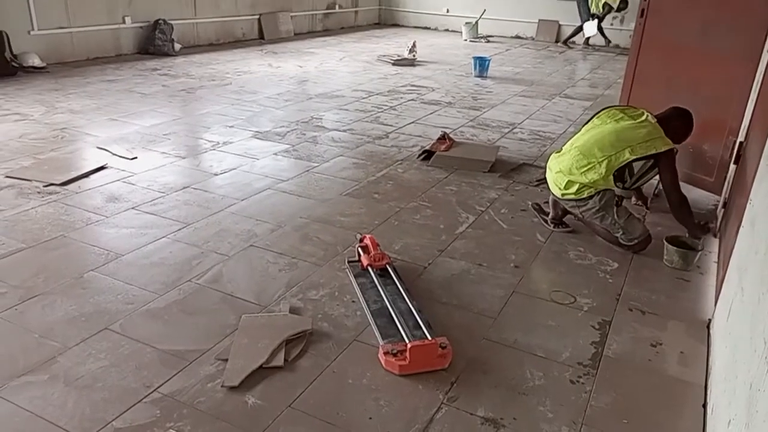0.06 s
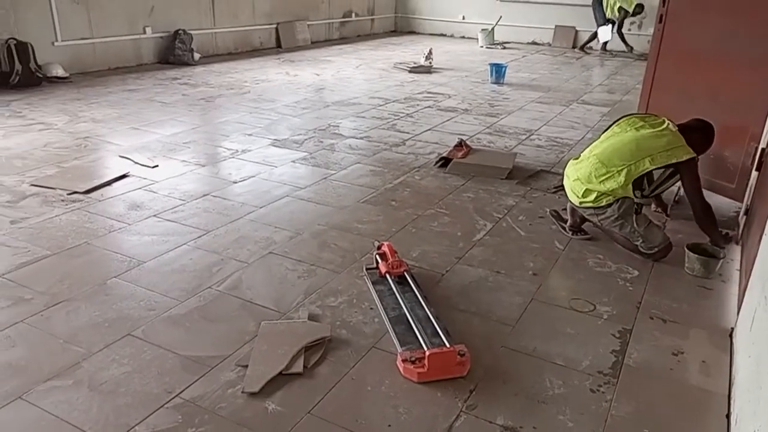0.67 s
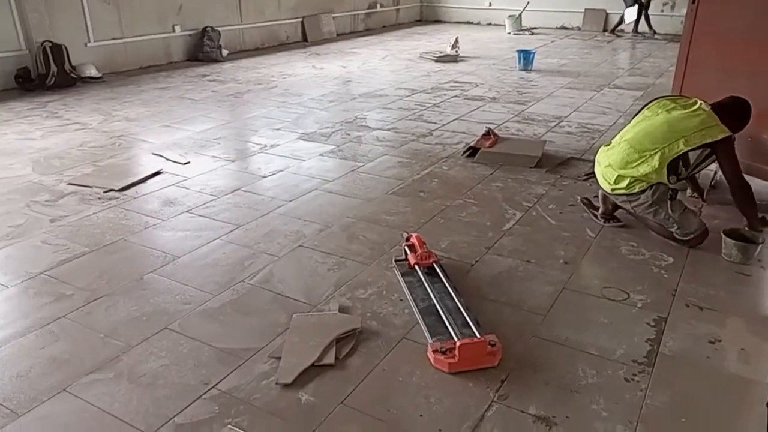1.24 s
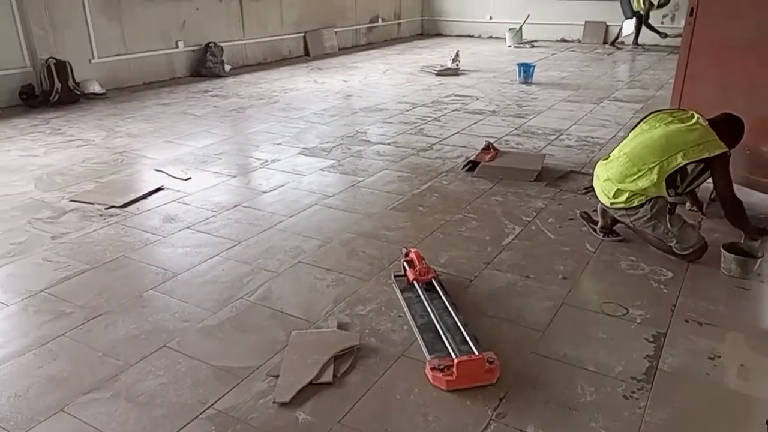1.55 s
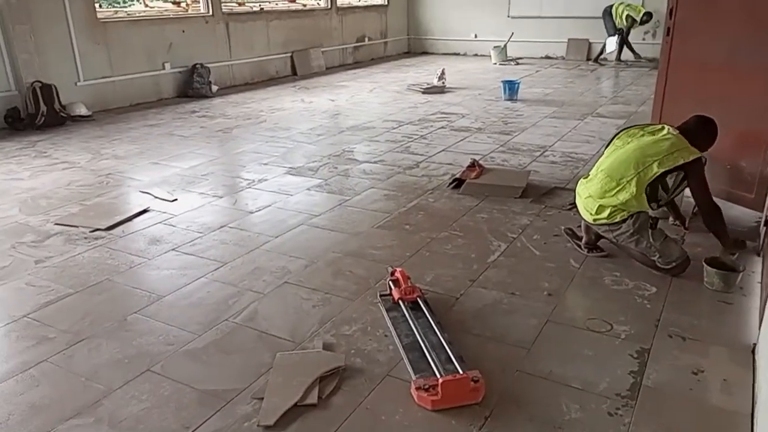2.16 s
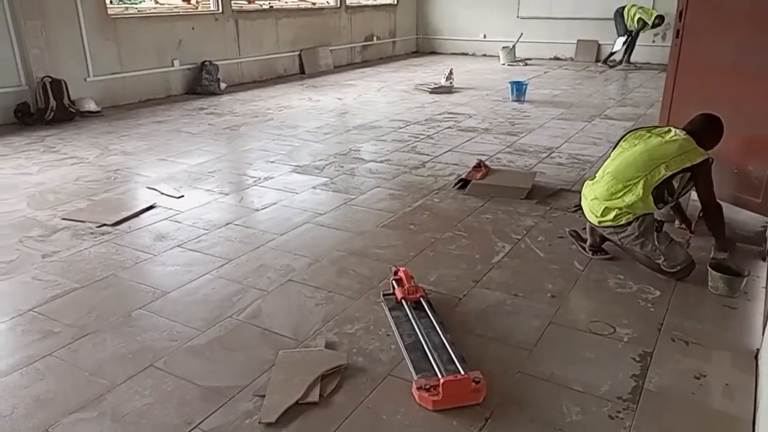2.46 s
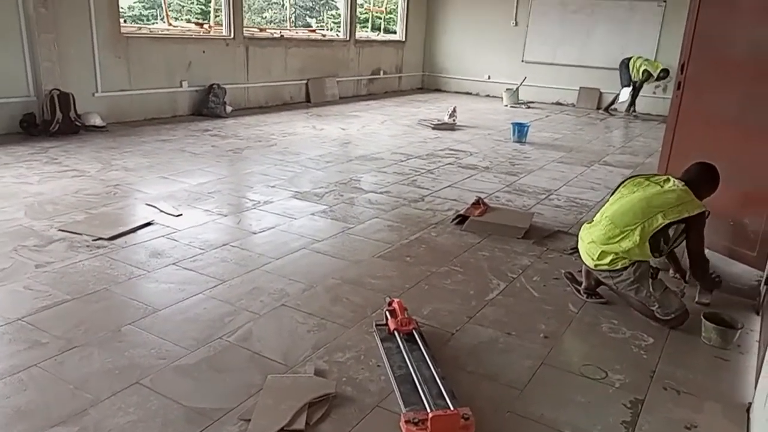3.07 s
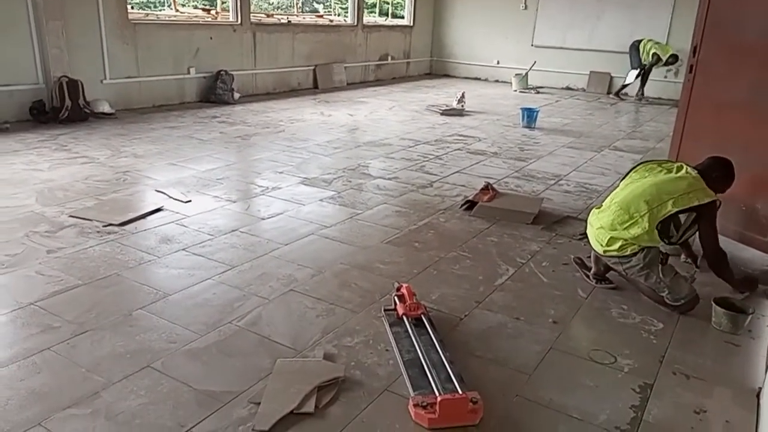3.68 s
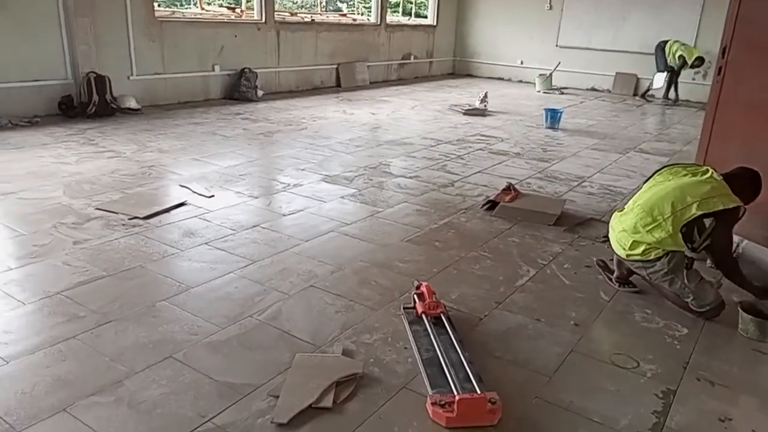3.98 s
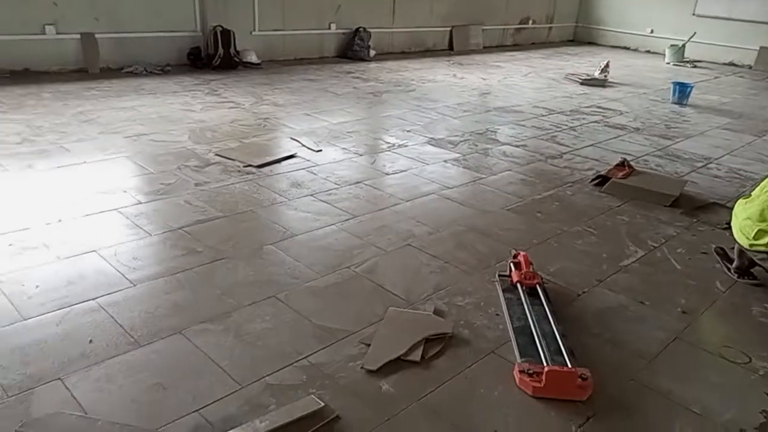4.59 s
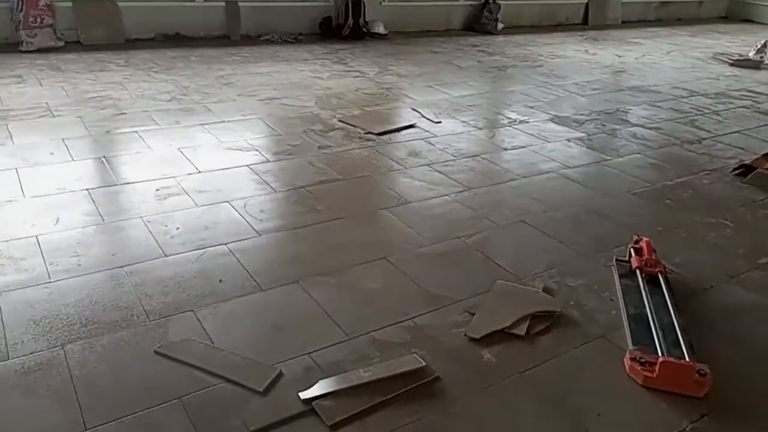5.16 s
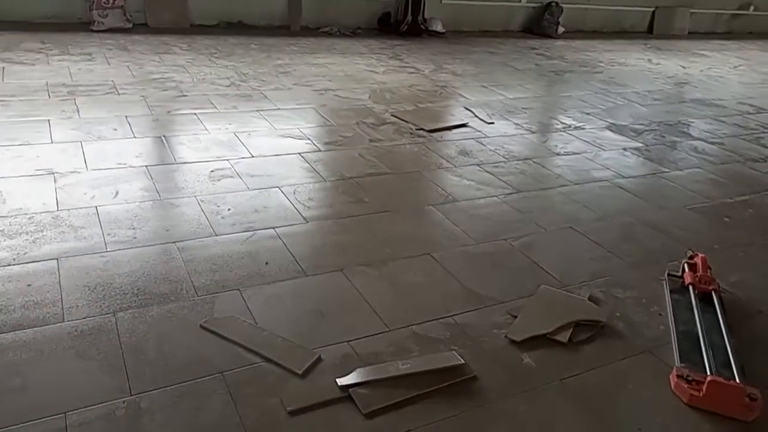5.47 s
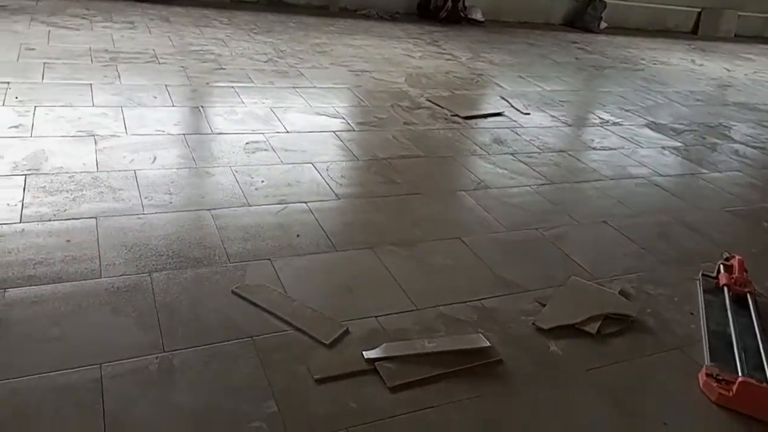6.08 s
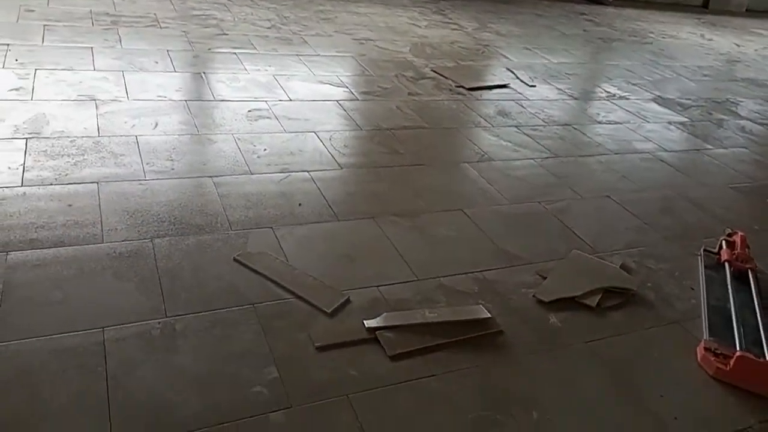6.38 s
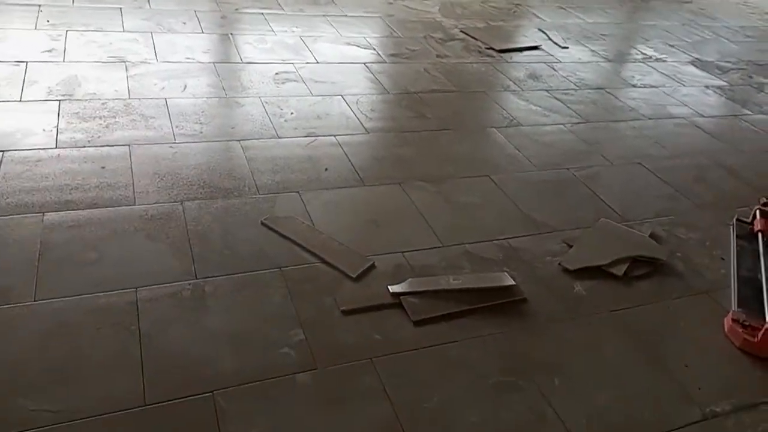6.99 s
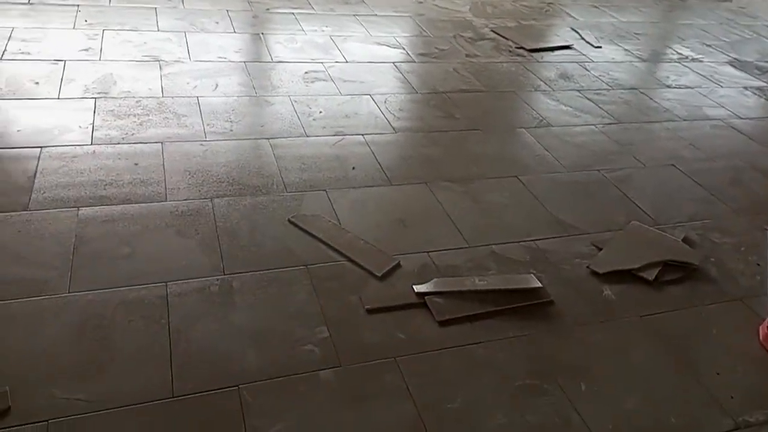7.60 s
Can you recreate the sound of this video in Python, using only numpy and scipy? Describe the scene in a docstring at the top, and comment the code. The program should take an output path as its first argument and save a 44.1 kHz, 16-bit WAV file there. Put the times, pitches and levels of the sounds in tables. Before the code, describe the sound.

A hard tool taps ceramic floor tiles into wet mortar from start to finish, about eight seconds, at three or four blows a second. Each tap is a short dead clack with a slight clink, and the large bare room rings for about half a second after it. The taps are firm and even for the first three seconds, with slight hesitations near 1.4, 2.3 and 3.4 seconds. They are a little softer and duller from about 3.6 to 4.6, firmer from 5 to 6, then lighter and less even. A small distant knock with a bright click comes near 2.9 seconds, a dull distant knock near 5.6, and a faint tick near 6.7. Faint room air and low rumble lie underneath, with soft bumps on the hand-held microphone around 3 and 3.6 seconds and between 6 and 6.5.

```python
"""A large bare room, where a tiler beds ceramic floor tiles with quick taps of a hard tool.
Each tap is a short dead clack: the tile's modes ring for milliseconds before wet mortar soaks them up.
Ceiling and walls throw it back, then the room rings for half a second. Under it lie faint air and
the rumble of a hand-held microphone, which also picks up a few soft bumps. Two duller knocks come
from farther off, the first small and with a bright click; a lone faint tick follows later."""
import sys
import numpy as np
from scipy import signal
from scipy.fft import rfft, irfft
from scipy.io import wavfile
from scipy.ndimage import uniform_filter1d, minimum_filter1d

SR = 44100
rng = np.random.default_rng(int(sys.argv[2]) if len(sys.argv) > 2 else 0)


def generate_wav(signal):
    """Clip the signal to [-1, 1] and save it as 16-bit WAV at the path in sys.argv[1]."""
    frames = np.transpose(np.atleast_2d(signal))
    scaled = np.clip(frames, -1, 1) * 32767
    pcm = np.round(scaled).astype(np.int16)
    wavfile.write(sys.argv[1], SR, pcm)


N = 345730
SIZE = 24576  # samples in one hit with its tail
HZ, TIME = np.fft.rfftfreq(SIZE, 1 / SR), np.arange(SIZE) / SR


def amp(db):
    """Decibels to gain."""
    return 10 ** (np.asarray(db) / 20)


def curve(points, hz=HZ):
    """Breakpoints joined by straight lines on a log-frequency axis."""
    freqs, values = np.transpose(points)
    return np.interp(np.log(hz + 1), np.log(freqs + 1), values)


def follow(automation, s):
    """The value of each automation lane at time s."""
    times, *lanes = np.transpose(automation)
    return [np.interp(s, times, lane) for lane in lanes]


def add(mix, s, sound):
    """Mixes a sound in at time s."""
    start = round(s * SR)
    sound = sound[max(-start, 0):]
    part = mix[max(start, 0):][:len(sound)]
    part += sound[:len(part)]


def bell(hz, width):
    """A resonance curve of height 1."""
    return 1 / (1 + (2 * (HZ - hz) / width) ** 2)


def ripple(width_hz):
    """A random EQ curve of unit spread, with lumps about this wide."""
    smoothing = np.exp(-(np.arange(len(HZ)) * width_hz / SR * np.pi / 2) ** 2)
    lumps = irfft(rfft(rng.standard_normal(SIZE)) * smoothing)[:len(HZ)]
    return lumps / lumps.std()


def eq(db):
    """The minimum-phase response that has this gain."""
    log_gain = np.log(amp(np.r_[db, db[-2:0:-1]]))
    return np.exp(np.conj(signal.hilbert(log_gain)))[:len(db)]


def delay(s):
    """The response of a plain delay."""
    return np.exp(-2j * np.pi * HZ * s)


# tone of a struck tile on wet mortar (frequency [Hz], gain [dB])
TILE_EQ = [(50, -23), (140, -6.5), (220, 13.5), (320, 18.5), (450, 12), (900, 11.5), (1400, 10.5),
           (1750, 15.5), (2650, 13), (3050, 4), (3700, 0.5), (4350, 4), (4900, 13), (6400, 16)]
# steep roll-off above the clink (frequency [Hz], gain [dB])
TILE_ROLLOFF = [(6400, 1), (7000, -8), (7600, -20.5), (8500, -33), (10000, -45.5), (14000, -50.5),
                (15300, -44)]
def tile_tone(force_db, hardness_db):
    """One blow's spectrum in dB: force barely lifts the thud; a hard contact lifts the edge most."""
    thud = 0.5 + 0.042 * force_db
    body = force_db + 0.03 + 0.05 * hardness_db
    clink = force_db + 1.5 + 0.49 * hardness_db
    edge = force_db + hardness_db
    colour = [(350, thud), (550, body), (1150, body), (1650, force_db), (3000, force_db),
              (4700, clink), (6000, clink), (7000, edge)]
    return curve(TILE_EQ) + curve(TILE_ROLLOFF) + curve(colour)


def tile_waves(spread_s=0.002181, decay_s=0.001):
    """Bending waves leave the tile treble first, and scatter between its edges until mortar damps them."""
    travel_s = spread_s / np.sqrt(1 + HZ / 1500)
    bending = np.exp(-2j * np.pi * np.cumsum(travel_s) * HZ[1])
    bounces = rng.standard_normal(SIZE) * TIME * np.exp(-TIME / decay_s)
    return (bending + rfft(bounces) / np.linalg.norm(bounces)) / np.sqrt(2)


# tone of the direct path along the floor (frequency [Hz], gain [dB])
DIRECT_EQ = [(130, 1.5), (300, 2), (430, -6.5), (570, 6.5), (860, -20), (1150, -1.5), (1800, -3.5),
             (2600, 3.5), (3600, -15), (5000, -0.5), (5600, -17), (6400, -1), (9000, 6)]
# tone of the ceiling slap (frequency [Hz], gain [dB])
CEILING_EQ = [(300, -8), (900, 2.5), (1500, 7), (2400, 6), (3500, 1.5), (5000, -6.5), (9000, 5.5)]
# early reflections off the walls (delay [s], level [dB], treble cut [dB])
WALL_ECHOES = [(.0046, -18.5, 12), (.0105, -27.5, 4.5), (0.0195, -27.5, -7.5), (0.0295, -15.5, 0),
               (0.034, -16.5, 1), (.0522, -22.5, 7)]
# as the microphone turns away, the direct path dulls and the ceiling comes forward
# (time [s], direct level [dB], direct treble shelf [dB], ceiling level [dB])
MIC_TURN = [(0, -5.5, -4.5, -20), (3.2, -5, -5, -19.5), (4.2, -3.5, -5, -12), (4.55, -6.5, -1, -16.5),
            (5.2, -8.5, -7, -16.5), (5.8, -6.5, -11, -15.5), (6.75, -3, -9, -9.5), (7.45, -7, -14, -16)]
def early_paths(s, shelf_hz=3800, ceiling_s=0.0258, wall_db=-2.5):
    """The ways a tap at time s reaches the microphone: direct, off the ceiling and off the walls."""
    direct_db, shelf_db, ceiling_db = follow(MIC_TURN, s)
    shelf = HZ ** 2 / (HZ ** 2 + shelf_hz ** 2)
    direct = amp(direct_db + shelf_db * shelf) * eq(curve(DIRECT_EQ))
    ceiling = amp(ceiling_db) * eq(curve(CEILING_EQ)) * delay(ceiling_s)
    walls = sum(delay(lag) * amp(db - cut * HZ / (HZ + 1500)) for lag, db, cut in WALL_ECHOES)
    return direct + ceiling + amp(wall_db) * walls


# reverb time of the bare room (frequency [Hz], base T60 [s])
ROOM_DECAY = [(150, 0.2), (300, 0.28), (700, 0.39), (1800, 0.49), (2600, 0.47), (3700, 0.37), (5200, 0.46),
              (6800, 0.41), (10000, 0.17)]
# narrow room resonances; the boosted ones hang on longer (frequency [Hz], width [Hz], gain [dB])
ROOM_MODES = [(234, 16, 0.5), (308, 12, -3), (344, 51, 1.5), (478, 30, 1.5), (625.3, 25, 7), (687, 5, -0.5),
              (775, 30, 3), (1430, 37, 2), (1710, 25, -3.5), (1755, 54, 3.5), (2674, 140, 3), (4856, 92, 3),
              (6700, 9.7, 0.5), (7070, 29, 1.5)]
ROOM_MODES_DB = sum(db * bell(hz, width) for hz, width, db in ROOM_MODES)
def room_tail(ring_hz, boom_hz, thin_db=-3, bloom_s=0.032, hold_s=0.076):
    """Reverb spectrum: thin until the ceiling answers, it holds, then dies; ring and boom linger."""
    linger = 1 + 0.066 * ROOM_MODES_DB + 0.11 * bell(ring_hz, 130) + 0.18 * bell(boom_hz, 60)
    t60 = curve(ROOM_DECAY) * linger * np.exp(0.18 * ripple(110))
    hz, t, bands = signal.stft(rng.standard_normal(SIZE), SR, nperseg=1024)
    decay = amp(-60 * np.maximum(t - hold_s, 0) / np.interp(hz, HZ, t60)[:, None])
    tail = signal.istft(bands * decay, SR, nperseg=1024)[1][:SIZE]
    attack = np.minimum(TIME / 0.00067, 1)
    bloom = amp(thin_db * np.clip((bloom_s - TIME) / 0.0031, 0, 1))
    spectrum = rfft(tail * attack * bloom)
    return spectrum / np.sqrt(uniform_filter1d(abs(spectrum) ** 2, size=160))  # flatten the broad tone


# the tile's modes drift as the tool moves over it; the main mode is the one that feeds the reverb
# (time [s], main mode [Hz], knock [Hz], ping [Hz], ping boost [dB])
TILE_MODES = [(0, 2510, 1530, 6090, 15), (1.7, 2310, 1800, 6500, 3.5), (3.2, 2540, 1478, 6450, 9),
              (4.6, 2350, 1590, 6360, 9.5), (5.2, 2580, 1380, 4700, 11), (5.8, 2640, 1070, 4670, -3),
              (6.2, 2880, 1790, 4880, 11), (6.8, 2740, 1230, 5120, 11.5), (7.6, 2780, 1680, 5130, 14)]
# the lowest mode booms more where the mortar leaves a hollow (time [s], pitch [Hz], boost [dB])
HOLLOW_BOOM = [(0, 302, -0.5), (2.9, 280, -2), (3.65, 280, -2), (4.1, 310, 0.5), (6.1, 353, 1),
               (6.8, 343, 2), (7.12, 381, 6.5), (7.7, 358, 0)]
# the tiler's blows (time [s], force [dB], contact hardness [dB], ring pitch [Hz], ring boost [dB])
TAPS = [(-0.115, 0.5, 3.5, 2580, -4), (0.1582, -0.5, 5, 2530, 12.5), (0.4413, 1, 4.5, 2600, 8),
        (0.7146, 0, 4, 2637, 12.5), (0.98, 0.5, 4.5, 2640, 9.5), (1.2461, -0.5, 5, 2800, 9.5),
        (1.6217, 0.5, 4.5, 2600, 9), (1.8723, 0.5, 6.5, 2560, 5.5), (2.0864, 0.5, 3.5, 2180, 4),
        (2.4318, 0.5, 2, 2520, 8.5), (2.6944, 0.5, 4.5, 2503, 11), (2.9491, -0.5, 4, 2480, 10),
        (3.2264, -0.5, 5, 2410, 8), (3.647, -4, 2, 2480, 6), (3.8271, 1.5, -22, 2220, 5.5),
        (4.1048, -3, -7.5, 2350, 13), (4.3293, -3, -1, 2285, 20), (4.5359, -3, 1.5, 2250, 16),
        (4.8296, -0.5, -1, 2130, 13.5), (5.182, -1, 6, 2670, 9.5), (5.514, 0, 4.5, 2730, 6.5),
        (5.785, -1, 4.5, 2420, 10), (6.1479, -4, -0.5, 2200, 5), (6.3192, -7, 0.5, 2060, 9),
        (6.59, -6.5, -5, 2110, 12.5), (6.8108, -0.5, -4, 2170, 2), (7.1168, -4.5, 0.5, 2727, 15),
        (7.446, -4, -1.5, 2820, 19.5), (7.6578, -1.5, -1, 2040, 12.5)]
def tile_taps(main_db=4.5, knock_db=6, weak_db=2, spot_db=1.77, reverb_db=-2.5, crossfade_s=0.45):
    """Each blow briefly rings a few damped modes of the tile, coloured by where the tool lands."""
    out = np.zeros(N)
    spare_lows = np.minimum(HZ / 700, 1)
    # the tail and the tile's many weak modes change as tool and microphone move
    keyframes = np.linspace(0, N / SR, num=16)
    tails = np.array([room_tail(follow(TILE_MODES, s)[0], follow(HOLLOW_BOOM, s)[0]) for s in keyframes])
    weak_modes_db = weak_db * np.array([ripple(130) for _ in keyframes]) * spare_lows
    for s, force_db, hardness_db, ring_hz, ring_db in TAPS:
        main_hz, knock_hz, ping_hz, ping_db = follow(TILE_MODES, s)
        boom_hz, boom_db = follow(HOLLOW_BOOM, s)
        blend = np.exp(-((keyframes - s) / crossfade_s) ** 2)
        blend /= np.linalg.norm(blend)
        blow_db = tile_tone(force_db, hardness_db) + boom_db * bell(boom_hz, 130) + blend @ weak_modes_db
        rings_db = knock_db * bell(knock_hz, 240) + ring_db * bell(ring_hz, 300)
        rings_db += ping_db * bell(ping_hz, 330)
        rings_db += spot_db * ripple(330) * spare_lows  # the struck spot favours some modes
        # single paths keep the rings distinct; the room averages over all directions
        early = eq(blow_db + rings_db) * tile_waves() * early_paths(s)
        send_db = blow_db + main_db * bell(main_hz, 260) + 0.29 * rings_db + reverb_db
        late = eq(send_db + ROOM_MODES_DB) * (blend @ tails)
        add(out, s - 0.0008, irfft(early + late))
    return out


# tone of the room's still air (frequency [Hz], relative level [dB])
AIR_EQ = [(25, -28), (80, -10), (300, -3.5), (700, -20), (2400, -2.5), (3500, -19.5), (6000, -2),
          (8500, -32.5), (15000, -48.5)]
def room_air(rms_db=-63):
    """Room tone: a faint steady wash of shaped noise."""
    colour = amp(curve(AIR_EQ, np.fft.rfftfreq(N, 1 / SR)))
    wash = irfft(rfft(rng.standard_normal(N)) * colour, N)
    return amp(rms_db) * wash / wash.std()


# fader ride of the handling noise (time [s], level before trim [dB])
RUMBLE_RIDE = [(0.0, -75.5), (3.54, -86), (4.08, -70.5), (4.43, -78), (6.16, -84), (6.64, -68), (7.05, -64),
               (7.18, -90), (7.84, -79)]
def hand_rumble(trim_db=3, band_hz=(55, 120), swell_db=4):
    """The hand on the microphone makes a faint rumble that comes and goes."""
    bandpass = signal.butter(2, band_hz, "bandpass", fs=SR, output="sos")
    rumble = signal.sosfilt(bandpass, rng.standard_normal(N))
    swell = np.interp(np.arange(N), np.linspace(0, N, num=70), rng.standard_normal(70))
    rumble *= amp(swell_db * swell)
    ride_db = follow(RUMBLE_RIDE, np.arange(N) / SR)[0]
    return amp(trim_db + ride_db) * rumble / rumble.std()


# the click of a small knock, and a lone tick later (time [s], level before the low cut [dB])
TICKS = [(2.849, -33), (6.725, -39)]
def bright_ticks(decay_s=0.0026, low_cut_hz=5000):
    """Faint bright ticks: tiny bursts of high-passed noise."""
    out = np.zeros(N)
    for s, db in TICKS:
        tick = rng.standard_normal(SIZE) * np.exp(-TIME / decay_s)
        add(out, s, amp(db) * tick / np.linalg.norm(tick))
    return signal.sosfilt(signal.butter(2, low_cut_hz, "highpass", fs=SR, output="sos"), out)


# dull tone of a far knock (frequency [Hz], gain [dB])
KNOCK_EQ = [(100, -7), (240, 18.5), (400, 6), (750, 21), (1100, 18), (1600, 15.5), (2500, 17), (3500, -2),
            (6000, -9), (9000, -53)]
# knocks from across the room (time [s], gain [dB])
FAR_KNOCKS = [(2.85, -18), (5.587, -4)]
def far_knocks(early_db=-7, ceiling_s=0.025):
    """Distant knocks arrive mostly as reverb, after a weak direct hit and its ceiling slap."""
    out = np.zeros(N)
    early = amp(early_db) * (1 + delay(ceiling_s))
    for s, db in FAR_KNOCKS:
        late = room_tail(ring_hz=2500, boom_hz=240)
        add(out, s, irfft(eq(curve(KNOCK_EQ) + db) * (early + late)))
    return out


# bumps on the microphone (time [s], envelope peak [dB], pitch [Hz], half-length [s])
MIC_BUMPS = [(3.015, -32.5, 108.7, 0.0065), (3.559, -38, 93, 0.0083), (5.432, -45, 124, 0.0055),
             (6.107, -40.5, 105, 0.0049), (6.208, -43, 125.7, 0.021), (6.444, -31, 140, 0.0058),
             (6.485, -39, 144, 0.03), (6.542, -46, 114, 0.027)]
def mic_bumps():
    """Bumps on the microphone make soft low thumps of a cycle or a few."""
    out = np.zeros(N)
    t = np.arange(N) / SR
    for s, db, hz, half_s in MIC_BUMPS:
        envelope = amp(db) * np.exp(-((t - s) / half_s) ** 2)
        out += envelope * np.cos(2 * np.pi * (hz * (t - s) + rng.random()))
    return out


def scene():
    """All sources at one microphone."""
    return (tile_taps() + room_air() + hand_rumble() + bright_ticks() + far_knocks() + mic_bumps())[None]


def record(dry, threshold_db=-10, release_db_per_s=500, high_cut_hz=16300):
    """A fast limiter holds down the sharpest peaks and lets go in milliseconds; then a steep high cut."""
    over_db = np.maximum(20 * np.log10(abs(dry[0]) + 1e-9) - threshold_db, 0)
    release_db = np.arange(N) * release_db_per_s / SR
    reduction_db = np.maximum.accumulate(over_db + release_db) - release_db
    gain = uniform_filter1d(minimum_filter1d(amp(-reduction_db), size=60), size=60)
    lowpass = signal.firwin(511, high_cut_hz, window=("kaiser", 9), fs=SR)
    return signal.oaconvolve(dry * gain, lowpass[None], "same")


dry = scene()
out = record(dry)
generate_wav(out)
```